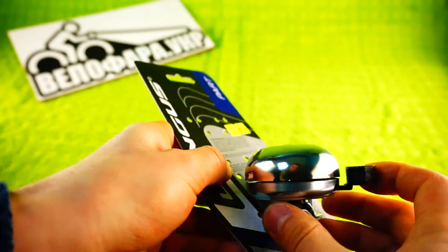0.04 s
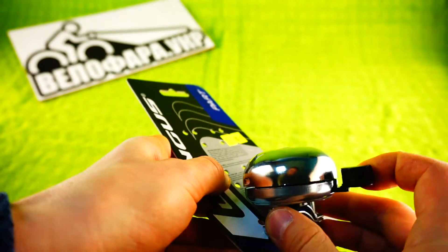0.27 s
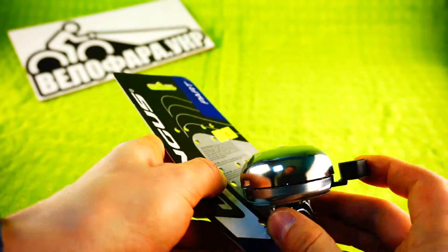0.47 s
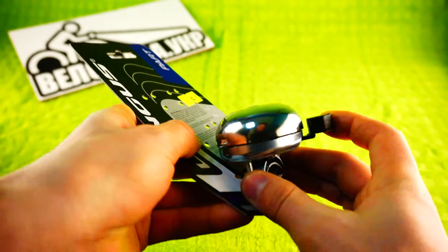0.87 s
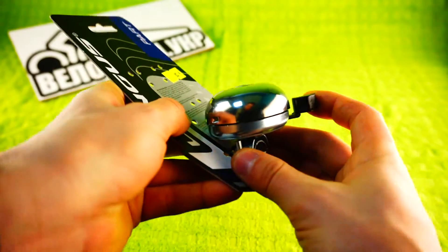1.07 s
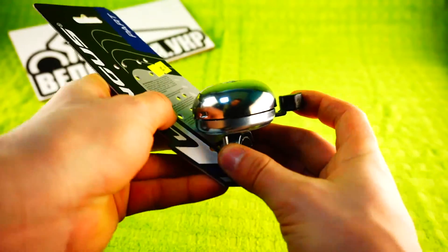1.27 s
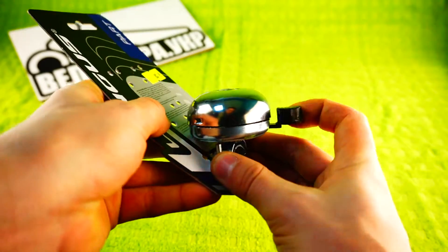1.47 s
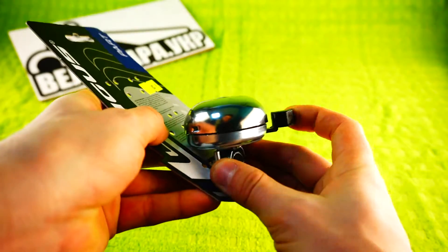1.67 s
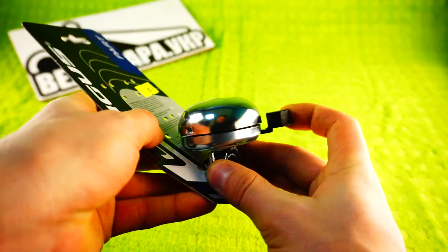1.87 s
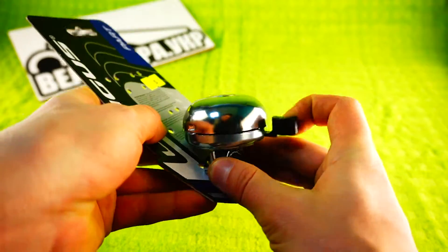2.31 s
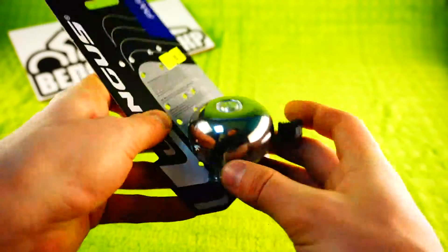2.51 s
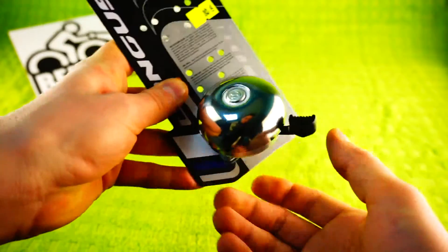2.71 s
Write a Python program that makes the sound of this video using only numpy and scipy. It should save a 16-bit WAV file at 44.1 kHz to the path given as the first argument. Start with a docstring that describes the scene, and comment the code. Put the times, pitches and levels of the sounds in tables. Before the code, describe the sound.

A metal bicycle bell is rung by hand, close by in a small room. After a brief rustle, three clear strikes ring out, then rapid repeats follow in twos and threes, with lever ticks and whirring gears underneath.

```python
"""In a small room, a hand-held chrome bicycle bell is rung close by.
Hands rustle on its backing card, then one push of the lever gives three strikes that ring out.
Next the lever is pumped, and the hammers hit the metal dome in quick twos and threes.
The dome rings with three pairs of close tones, and each pair beats (wobbles in loudness).
Under the ringing, the lever ticks and the gears whirr."""
import sys
import numpy as np
from scipy import signal
from scipy.fft import rfft, irfft, next_fast_len
from scipy.io import wavfile

SR = 44100
rng = np.random.default_rng(int(sys.argv[2]) if len(sys.argv) > 2 else 0)


def int16_out(signal):
    """Quantize to a 16-bit WAV file."""
    q = np.round(np.clip(np.atleast_2d(signal).T, -1, 1) * 32767)
    wavfile.write(sys.argv[1], SR, q.astype(np.int16))


N = 125685
T = np.arange(N) / SR

# How alike a noise is in the two ears: f/Hz, likeness (1 = the same)
EAR_LIKENESS = [(60, 0.85), (300, 0.5), (1500, .7), (5000, 0.28), (11000, 0.69)]
# Tone colours, or how strong each noise is from low to high pitch: f/Hz, relative level/dB
RUSTLE_COLOUR = [(30, -3), (100, 0), (280, 5), (600, -9), (920, -1), (1100, -6.5), (1500, -3), (2200, -9.5),
                 (3500, -11), (6000, -20.5), (11000, -24)]
HISS_COLOUR = [(30, -8), (100, -9), (230, 1), (450, -8), (900, -12.5), (1700, -1), (2500, -5),
               (3300, -15.5), (4200, -16), (6000, -26), (11000, -31.5)]
KNOCK_COLOUR = [(60, -30.5), (300, -21), (650, -26), (920, -3.5), (1100, -19.5), (1500, 7.5), (1750, 1.5),
                (2200, -8), (3000, -17.5), (4200, -15), (7000, -32), (11000, -39.5)]
CATCH_COLOUR = [(600, -21), (1500, -4), (3500, 2), (7500, -3), (11000, -22)]
SCRAPE_COLOUR = [(600, -17), (1500, -5.5), (3800, -1), (6000, -35)]
SLIDE_COLOUR = [(1200, -31), (2200, -2.5), (2650, -0.5), (2900, -6), (3300, -30)]
GEAR_COLOUR = [(300, -48), (700, -34), (900, -13), (1130, -27.5), (1480, 0), (1750, -1.5), (3200, -21),
               (4300, -5), (7000, -13.5), (10000, -17)]
CLACK_COLOUR = [(60, -34.5), (300, -26), (600, -25.5), (930, -14), (1150, -18.5), (1500, 0.5), (2000, -1),
                (2500, -5), (3300, -19), (4300, 5.5), (5300, 4), (6700, -5), (7800, -8), (9500, 8.5),
                (11000, -13)]
ROOM_COLOUR = [(60, -38.5), (300, -38), (550, -28), (900, -12.5), (1130, -25.5), (1480, 8.5), (1750, -4),
               (2400, -7.5), (3200, -21), (4400, 1), (5400, -5), (6600, -11), (7800, -12), (9300, -9),
               (11000, -16)]
PING_COLOUR = [(1000, -54.5), (4300, -22.5), (5300, 3), (5750, -2.5), (6500, -26), (11000, -41.5)]
BUMP_COLOUR = [(40, -15.5), (130, -10), (210, -3.5), (600, -35.5)]

# Rise and fall of the background hiss: t/s, level/dB
HISS_LEVELS = [(0, -77.5), (.6, -79), (.9, -70), (1.25, -66.5), (1.445, -68.5), (1.465, -76.5), (2.0, -90),
               (2.85, -88.5)]
# Knocks of the lever in its plastic housing: t/s, relative level/dB
LEVER_KNOCKS = [(0.0982, -47), (.161, -50.5), (0.1719, -53.5), (.184, -50), (0.196, -44), (0.2275, -52.5),
                (0.3181, -59.5), (.508, -64.5), (0.599, -66.5), (1.0014, -57.5), (1.0353, -55.5),
                (1.431, -50), (1.439, -52.5), (1.849, -62), (2.0279, -57.5), (2.178, -65), (2.567, -55.5),
                (2.618, -57.5)]
# Light, bright catches of the lever's spring: t/s, level/dB
SPRING_CATCHES = [(0.131, -50.5), (0.853, -66), (0.906, -65.5)]
# Hammer strikes: t/s, relative clack level/dB, then each of the six tones' level/dB before its swell
HAMMER_STRIKES = [(0.2, -42, -47, -19, -35, -17.5, -24.5, -20),
                  (0.4107, -43.5, -45, -28, -33, -21.5, -28.5, -19.5),
                  (0.4556, -43, -55.5, -28.5, -38, -21.0, -29.5, -18),
                  (1.4483, -46, -62.5, -47.5, -41, -27.5, -66, -43),
                  (1.5058, -44.5, -66, -55.5, -37.5, -22.5, -64.5, -40),
                  (1.614, -41, -60, -49.5, -37.0, -28, -64, -40),
                  (1.651, -44, -61.5, -50.5, -36.5, -31, -64, -42),
                  (1.7725, -42, -63, -50, -37.5, -25.5, -55, -41),
                  (1.806, -44.5, -61, -56.5, -49, -23.0, -59, -44),
                  (1.9043, -47.5, -58.5, -76, -44.5, -40.5, -51, -38.5),
                  (1.9365, -45.0, -60, -50, -33.5, -24.5, -52, -39.5),
                  (1.9689, -46.0, -60, -58.5, -31.5, -23, -62, -34.5),
                  (2.0634, -42.5, -60, -48.5, -22, -24, -51, -35.5),
                  (2.0871, -43, -63, -47, -28, -22, -63, -42.5),
                  (2.1131, -45, -54, -49.5, -35, -22.5, -63, -40),
                  (2.218, -44.5, -76, -49, -25, -32.5, -54, -31.5),
                  (2.252, -44, -63, -46.5, -28.0, -37.5, -52, -31.5),
                  (2.3269, -42.5, -60, -46.5, -29, -26, -59, -30.5),
                  (2.3464, -40, -57, -50, -28.5, -30.5, -63, -38.5),
                  (2.3688, -48, -61, -50, -30.5, -29, -68, -33.0),
                  (2.4776, -47.5, -65, -53, -25.5, -26.5, -58, -30),
                  (2.5072, -46.0, -69, -66, -52, -29, -57, -32),
                  (2.5315, -44, -58, -57, -41.5, -48, -59, -46.5)]
# The dome's six tones, in close pairs: f/Hz, time to fade by 60 dB/s
DOME_TONES = [(1890, 3.4), (1973.3, 4.15), (4898.5, 2.95), (4970.5, 2.164), (8696.5, 0.8), (8867, 0.77)]
# Slow swell and fade of each tone, lowest first: t/s, left level/dB, right level/dB
LOW_SWELL_1 = [(0.2, 4, -19), (0.7, 7.5, 0), (1.2, -8, 8.5), (1.5, 8.5, 11), (2.5, -1.5, 1),
               (2.85, -13.5, 18.5)]
LOW_SWELL_2 = [(0.2, -26, -20.5), (0.599, -6, 3), (0.799, -8, 9), (1.0, -17.5, 10.5), (1.3, -13, 10.0),
               (1.4, -3, 10.0), (1.9, 2.0, 7), (2.5, 10, 13.5), (2.7, 6.5, 13.5), (2.85, 17.5, 5)]
MIDDLE_SWELL_1 = [(0.2, -17, -4), (0.398, -4, -3), (0.501, -1.5, -17), (0.701, 6, -10), (1.2, 3, 14),
                  (1.899, 6.5, 17.5), (1.999, -18.5, -5.5), (2.5, -3, 0), (2.601, 3.5, 10),
                  (2.85, -2.5, -43.5)]
MIDDLE_SWELL_2 = [(0.199, -10.5, -8), (0.402, 2, 0.5), (0.5, -2.5, -1.5), (0.7, 2, 2.5), (0.902, 5.5, 11.0),
                  (1.1, -5, 11.5), (1.6, -30, 4), (1.698, -10, 4), (2.2, -14, 3), (2.7, -2, 17.5),
                  (2.85, -12.5, 9.5)]
HIGH_SWELL_1 = [(.2, -11, -17), (.3, -32, -6.5), (.6, -8, -3.5), (.72, -15.5, -23.5), (.82, 8.5, 7.5),
                (1.0, 7, 13), (1.25, -3.5, -10.5), (1.45, 4, 14), (2.5, 15.5, 18), (2.7, 27, 14),
                (2.85, -12, 27.5)]
HIGH_SWELL_2 = [(.2, -15.5, -9.5), (0.399, -25.5, -7), (0.701, -6, -26.5), (1.249, -14, -21),
                (1.449, 14.5, 4), (1.8, 21, 0.5), (1.9, 19, 13.5), (2.3, 10.5, 10), (2.5, 7, -2),
                (2.7, 1.5, -2.5), (2.85, 6, -12)]
# The ring reaches the two ears out of step: f/Hz, left ear's lead/rad
LEFT_LEAD = [(1900, -2), (4950, -0.81), (8800, -0.1)]
# Strikes that also set off a ping: t/s, level/dB
PING_STRIKES = [(0.4112, -35.5), (0.4553, -39)]
# Soft bumps of the hands on the bell: t/s, level/dB
HAND_BUMPS = [(1.444, -62.5), (1.726, -78)]

HAMMER_PAN_DB, LEVER_PAN_DB = -3.5, -4.5   # left minus right: both sit a little to the right


def from_db(db):
    """Turn decibels into a number to multiply by."""
    return 10 ** (np.asarray(db) / 20)


def in_time(rows):
    """Join points in time with straight lines, one curve for each level column."""
    times, *columns = np.transpose(rows)
    return np.array([np.interp(T, times, column) for column in columns])


def at_hz(points, hz):
    """Read between a table's frequencies, giving every octave equal room."""
    frequencies, values = np.transpose(points)
    return np.interp(np.log(hz), np.log(frequencies), values)


def pan(db):
    """Left and right gains that differ by this many decibels."""
    return from_db(np.array([[db], [-db]]) / 2)


def noise(colour, envelope=1):
    """Stereo noise whose loudness follows the envelope, filtered to the given tone colour."""
    size = 2 * next_fast_len(N // 2 + 4096)
    hz = np.maximum(np.arange(size // 2 + 1) * SR / size, 1)
    gain = from_db(at_hz(colour, hz))
    # build the filter so that it rings after a click, never before it
    cepstrum = irfft(np.log(gain / np.sqrt(np.mean(gain ** 2))))
    response = np.exp(rfft(np.r_[cepstrum[0], 2 * cepstrum[1:size // 2]], size))
    mid, side = rfft(rng.standard_normal((2, N)) * envelope, size) * response
    alike = np.clip(at_hz(EAR_LIKENESS, hz), -1, 1)
    shared = np.sqrt((1 + alike) / 2) * mid
    opposite = np.sqrt((1 - alike) / 2) * side * [[1], [-1]]
    return irfft(shared + opposite)[:, :N]


def bursts(times, db, fade_s):
    """A loudness curve that jumps at each given time, then falls 60 dB in fade_s seconds."""
    power = np.zeros(N)
    starts = np.clip(np.asarray(times) * SR, 0, N - 1).astype(int)
    np.add.at(power, starts, from_db(db) ** 2)
    decay = from_db(-60 / (fade_s * SR)) ** 2
    return np.sqrt(signal.lfilter([1], [1, -decay], power + 1e-20))


def rustle_and_hiss():
    """Hands rub the card at the start; a soft hiss swells as the first ringing fades."""
    rustle_s, release_s = .19, .033
    handling = np.clip((rustle_s - T) / release_s + 1, 0, 1)
    rustle = from_db(-59) * handling * noise(RUSTLE_COLOUR)
    hiss = from_db(in_time(HISS_LEVELS)) * noise(HISS_COLOUR)
    return rustle + hiss


def lever():
    """The lever knocks in its housing, catches on its spring, scrapes and slides softly back."""
    times, db = np.transpose(LEVER_KNOCKS)
    hits = bursts(times, db + 7, fade_s=.021)
    tails = bursts(times, db - 7, fade_s=.19)
    knocks = noise(KNOCK_COLOUR, np.hypot(hits, tails))
    catches = noise(CATCH_COLOUR, bursts(*np.transpose(SPRING_CATCHES), fade_s=.025))
    scrape = noise(SCRAPE_COLOUR, bursts(times=[.3176], db=[-60.5], fade_s=.16))
    easing_back = np.exp(-((T - 1.085) / .13) ** 2)   # a smooth hump that peaks at 1.085 s
    slide = noise(SLIDE_COLOUR, from_db(-67.5) * easing_back)
    return (knocks + catches + scrape + slide) * pan(LEVER_PAN_DB)


def gears():
    """Fine teeth click so fast that they whirr, loudest as the hammers spin past the dome."""
    clicks_per_s, fade_db_per_s, spread_db = 830, 379, 3
    strike_times = np.array(HAMMER_STRIKES)[:, :1]
    to_nearest_strike_s = np.abs(T - strike_times).min(axis=0)
    clicks = rng.random(N) < clicks_per_s / SR
    db = -59.5 - fade_db_per_s * to_nearest_strike_s + spread_db * rng.standard_normal(N)
    return noise(GEAR_COLOUR, bursts(T[clicks], db[clicks], fade_s=.021)) * pan(LEVER_PAN_DB)


def hammers():
    """Each hammer hits the dome with a hard clack that lingers briefly in the room."""
    times, db = np.transpose(HAMMER_STRIKES)[:2]
    clack = noise(CLACK_COLOUR, bursts(times, db + 12, fade_s=.0083))
    room = noise(ROOM_COLOUR, bursts(times, db - 3, fade_s=.13))
    return (clack + room) * pan(HAMMER_PAN_DB)


def dome():
    """Each strike leaves the dome's six tones ringing at new levels; close tones beat together."""
    strikes = np.array(HAMMER_STRIKES)
    times, levels = strikes[:, 0], strikes[:, 2:]
    latest = np.maximum(np.searchsorted(times, T, side="right") - 1, 0)
    since_strike_s = np.maximum(T - times[latest], 0)
    # a touching hammer nudges each wave a little forward or back, in radians
    nudges = rng.uniform(-1.1, 1, levels.shape) * .6 * np.sqrt(3)
    shifts = np.cumsum(nudges, axis=0)
    contact_s = .00048   # the hammer's touch smooths each jump in the ring
    smooth = np.exp(-2 / (contact_s * SR))
    swells = LOW_SWELL_1, LOW_SWELL_2, MIDDLE_SWELL_1, MIDDLE_SWELL_2, HIGH_SWELL_1, HIGH_SWELL_2
    rings = []
    for (hz, fade_s), db, shift, swell in zip(DOME_TONES, levels.T, shifts.T, swells):
        loudness = (T >= times[0]) * from_db(db[latest] - 60 * since_strike_s / fade_s)
        nudged = loudness * np.exp(1j * shift[latest])
        envelope = signal.lfilter([(1 - smooth) ** 2], [1, -2 * smooth, smooth ** 2], nudged)
        tone = envelope * np.exp(2j * np.pi * hz * T)
        ears = np.exp(.5j * at_hz(LEFT_LEAD, hz) * np.array([[1], [-1]]))
        rings.append(tone * ears * from_db(in_time(swell)))
    # when the second tone rings loudly, it adds a faint tone an octave higher
    octave = np.abs(rings[1]) ** 2.585 * np.sin(2 * np.angle(rings[1]))
    return np.imag(sum(rings)) + octave


def pings():
    """Two hard strikes add a short, bright ping just above the dome's middle pair of tones."""
    return noise(PING_COLOUR, bursts(*np.transpose(PING_STRIKES), fade_s=.03)) * pan(HAMMER_PAN_DB)


def bumps():
    """The hands bump dully on the bell as the grip shifts."""
    width_s = .008
    humps = sum(from_db(db) * np.exp(-((T - at_s) / width_s) ** 2) for at_s, db in HAND_BUMPS)
    return noise(BUMP_COLOUR, humps)


def scene():
    """Add up the bell, its moving parts, the hands and the hiss."""
    return dome() + pings() + hammers() + gears() + lever() + bumps() + rustle_and_hiss()


def record(dry):
    """Cut away the highest treble steeply."""
    cutoff_hz = 11000
    return signal.sosfilt(signal.ellip(10, .1, 70, cutoff_hz, fs=SR, output="sos"), dry)


dry = scene()
out = record(dry)
int16_out(out)
```